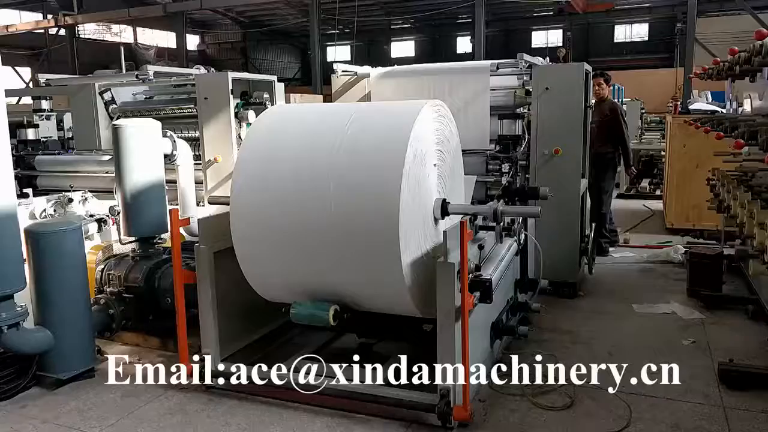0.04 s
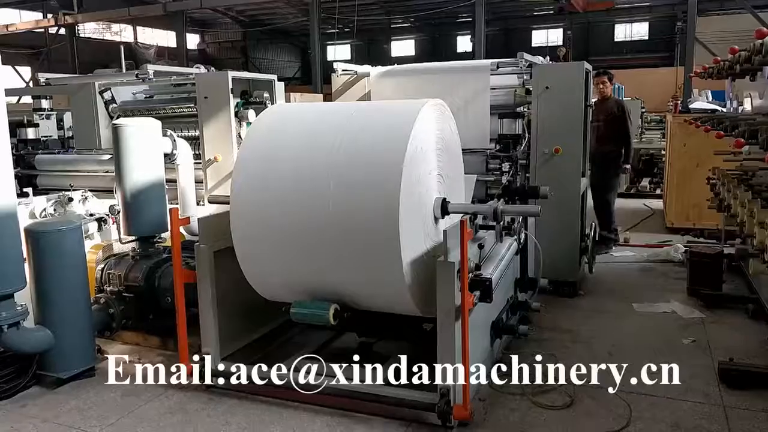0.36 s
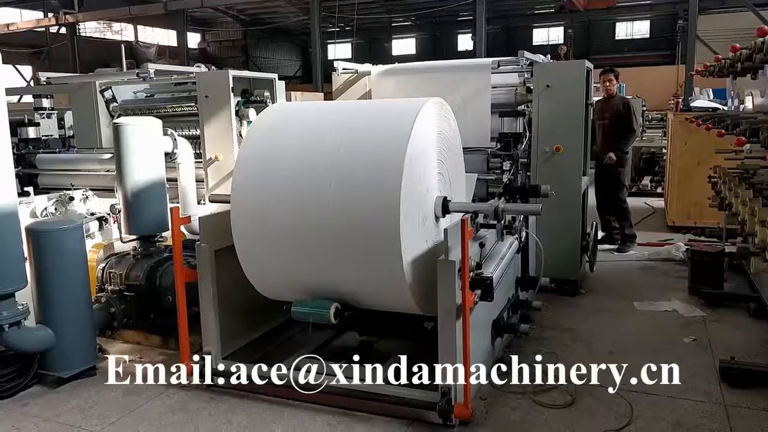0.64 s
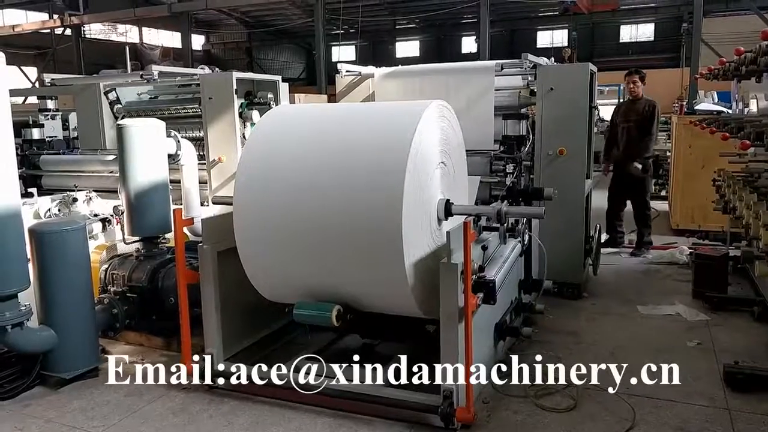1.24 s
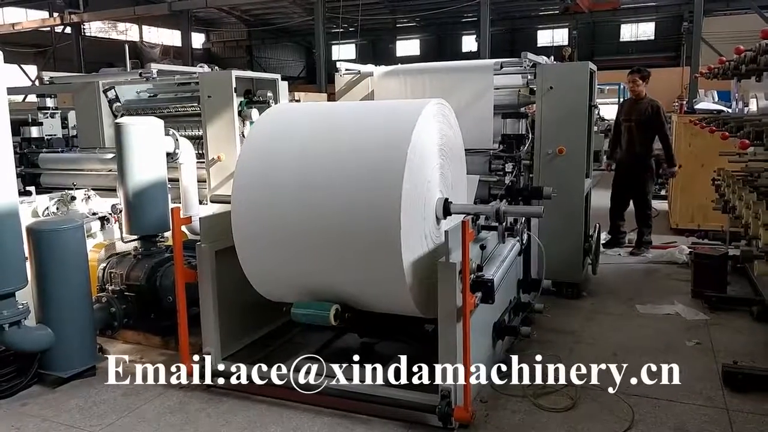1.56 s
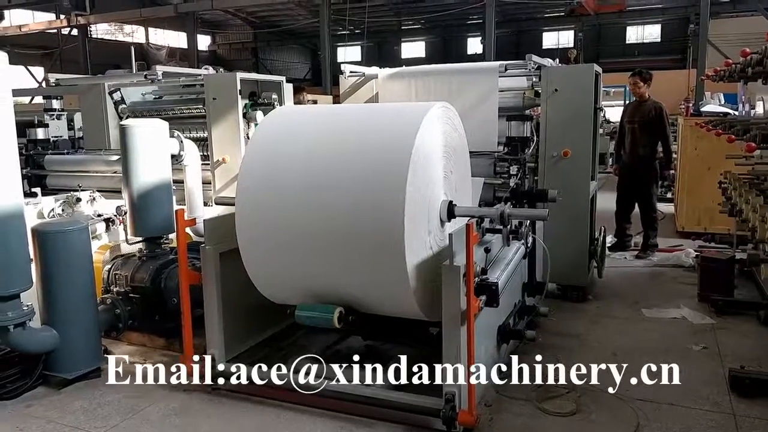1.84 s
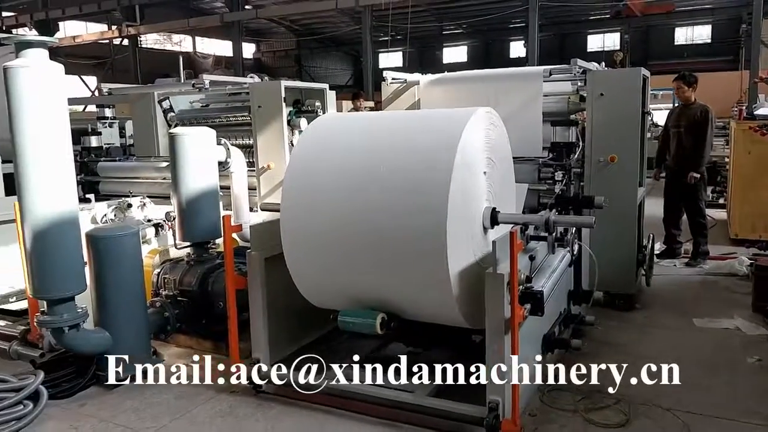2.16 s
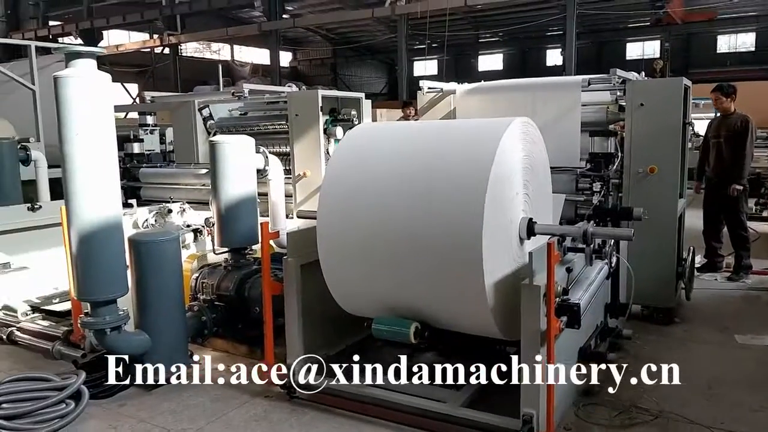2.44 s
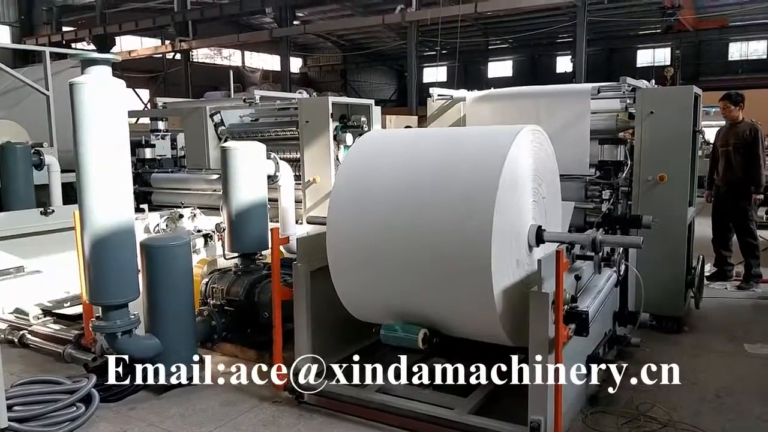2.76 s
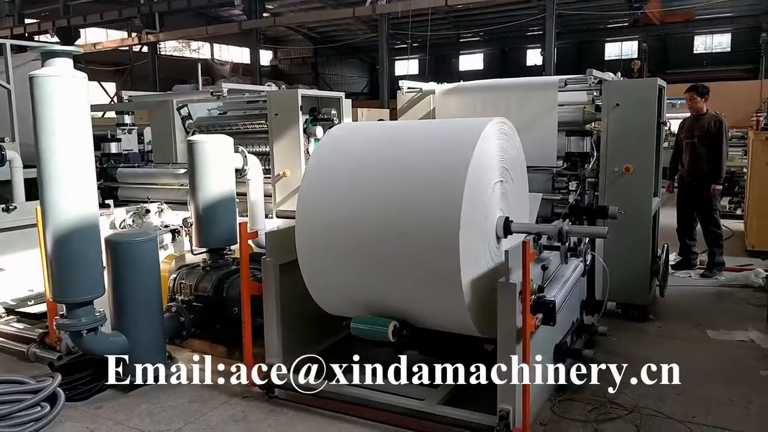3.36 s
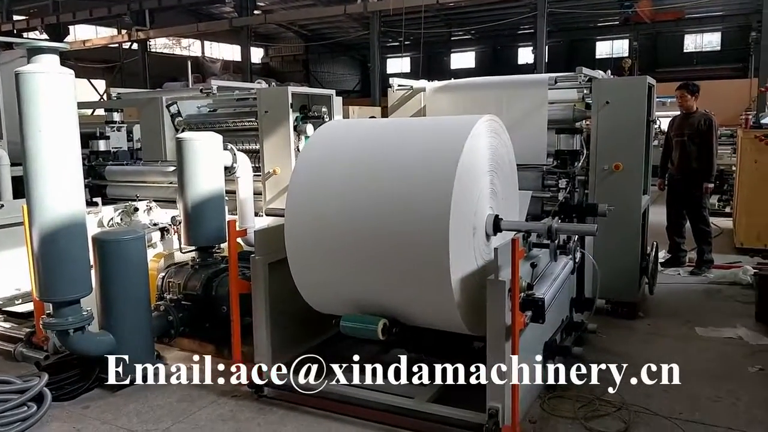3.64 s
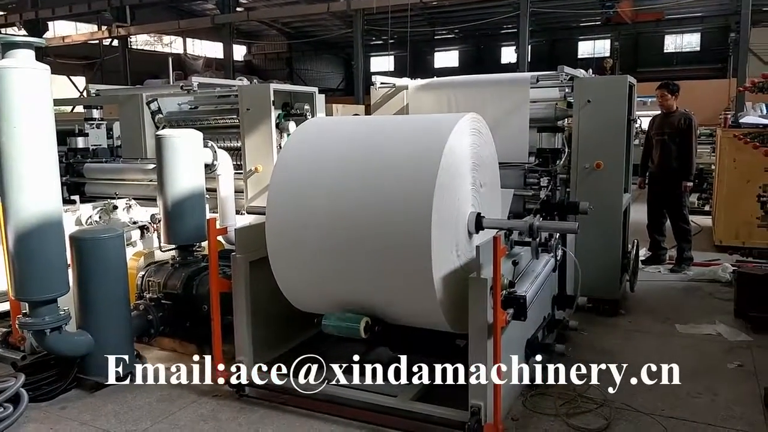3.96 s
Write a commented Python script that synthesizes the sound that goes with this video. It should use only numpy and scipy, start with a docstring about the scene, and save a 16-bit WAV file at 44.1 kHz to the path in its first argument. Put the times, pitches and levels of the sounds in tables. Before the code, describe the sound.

A factory machine clacks rapidly and evenly over a steady humming drone in a hall.

```python
"""A paper converting machine runs in a factory hall. The sound fades in on the drone of a vacuum
blower, humming drive gears, a motor whine and the roar of the hall. From 0.26 s the cutting and
folding head clacks eight times a second, each clack a rattling double blow under which a limiter
dips the drone. From about 0.4 s a roller rubs now and then. A hollow rumble swells at 1.5 s,
a brief hiss follows at 2.2 s, and the rumble returns near 3.3 s."""
import sys
import numpy as np
from scipy import signal
from scipy.fft import rfft, irfft
from scipy.io import wavfile
from scipy.ndimage import uniform_filter1d

SR = 44100
rng = np.random.default_rng(int(sys.argv[2]) if len(sys.argv) > 2 else 0)


def master_out(mix):
    """Clip the mix to full scale and print it as 16-bit PCM to the path in sys.argv[1]."""
    frames = np.transpose(np.atleast_2d(mix))
    ceiling = np.clip(frames, -1, 1)
    pcm = np.round(ceiling * 32767).astype(np.int16)
    wavfile.write(sys.argv[1], SR, pcm)


N = 176400
TIME, FREQ = np.arange(N) / SR, np.fft.rfftfreq(N, 1 / SR)


def amp(db):
    """The decibel scale: 20 dB is a factor of ten in amplitude."""
    return 10 ** (np.asarray(db) / 20)


def unit(x):
    """Normalisation to an rms of one."""
    return x / np.sqrt(np.mean(x ** 2) + 1e-20)


def read(points, hz):
    """Interpolation on a logarithmic frequency axis."""
    f, value = np.transpose(points)
    return np.interp(np.log(hz + 1), np.log(f + 1), value)


def colour(x, gain):
    """Linear filtering: a gain for each frequency."""
    return irfft(rfft(x) * gain, N)


def wander(rate_hz):
    """Low-pass noise: random motion with an rms of one."""
    return unit(colour(rng.standard_normal(N), np.exp(-(FREQ / rate_hz) ** 2) * (FREQ > 0)))


def tones(table, base_hz, waver, waver_hz):
    """Rotation radiates partials at multiples of a base rate, each wavering in level and phase."""
    turn = 2 * np.pi * np.cumsum(base_hz * np.ones(N)) / SR
    out = np.zeros((2, N))
    for multiple, db, lag in table:
        phasor = np.exp(1j * (multiple * turn + rng.uniform(0, 2 * np.pi)))
        phasor *= 1 + waver * (wander(waver_hz) + 1j * wander(waver_hz))
        out += np.sqrt(2) * amp(db) * np.array([phasor.real, (phasor * np.exp(-1j * lag)).real])
    return out


# Likeness of left and right: frequency_hz, correlation
COHERENCE = [(30, 1), (100, 1), (280, 0.91), (430, 0.6), (600, 0), (1000, 0.08), (16000, 0.06)]
def diffuse(gain):
    """A diffuse field: noise coherent between the ears in the bass, nearly unrelated above."""
    common, separate = rng.standard_normal((2, N))
    same = read(COHERENCE, FREQ)
    right = colour(common, gain * same) + colour(separate, gain * np.sqrt(1 - same ** 2))
    return unit(np.array([colour(common, gain), right]))


# Lobe passing rate: time_s, rate_hz
LOBE_RATE = [(0, 160.9), (1.2, 160.2), (2.1, 160.5), (4, 160.7)]
# Blower partials: lobe_rate_multiple, level_db, right_lag_rad
BLOWER_PARTIALS = [(.5, -36.5, 0), (1, -13, -0.14), (2, -17, 0.12), (3, -33, 1), (3.5, -37, -0.82),
                   (10, -44, 1)]
def blower():
    """Periodic flow: the lobes of the vacuum blower pulse the air into a drone."""
    lobe_hz = np.interp(TIME, *np.transpose(LOBE_RATE))
    return tones(BLOWER_PARTIALS, lobe_hz, waver=0.063, waver_hz=8.7)


# Gear partials: stroke_rate_multiple, level_db, right_lag_rad
GEAR_PARTIALS = [(8.11, -43.5, 0), (11.91, -44.5, 0), (14.02, -34, 0), (14.98, -22.5, 0),
                 (45.4, -35.5, 0.25)]
def gears(stroke_hz=8.078, throb_depth=0.13, throb_peak_s=0.206):
    """Amplitude modulation: the hum of the drive gears throbs once in two strokes."""
    throb = 1 + throb_depth * np.cos(np.pi * stroke_hz * (TIME - throb_peak_s))
    return throb * tones(GEAR_PARTIALS, stroke_hz, waver=0.097, waver_hz=7.1)


# Motor partials: base_rate_multiple, level_db, right_lag_rad
MOTOR_PARTIALS = [(883, -33.5, 0.75), (882, -49.5, -0.9)]
def motor():
    """Interference: two close, wavering tones merge into a motor whine near 839 Hz."""
    return tones(MOTOR_PARTIALS, base_hz=0.95, waver=0.3, waver_hz=3.6)


# Spectrum of the roar: frequency_hz, relative_db
ROAR_SPECTRUM = [(20, -17), (50, -8), (85, -14.5), (115, 2.5), (200, 0), (340, -0.5), (480, -4.5),
                 (620, -6), (760, -3.5), (1020, -6), (1200, -14), (1800, -17.5), (2300, -13), (3200, -13),
                 (4500, -20.5), (5600, -18), (6600, -34), (8000, -23.5), (9500, -28.5), (13000, -24),
                 (16000, -26)]
def hall_roar(level_db=-17.5, flutter_db=1.5):
    """Incoherent sources add: running paper, bearings and other machines blend into a roar."""
    roar = diffuse(amp(read(ROAR_SPECTRUM, FREQ)))
    return amp(level_db) * roar * amp(flutter_db * wander(rate_hz=33))


def burst(start_s, decay_s, attack_s=0.003):
    """Damped transient: a linear rise, then exponential decay."""
    t = np.maximum(TIME - start_s, 0)
    return np.minimum(t / attack_s, 1) * np.exp(-np.maximum(t - attack_s, 0) / decay_s)


# Strokes of the head: start_s, first_blow_relative_db, second_blow_relative_db
STROKES = [(0.255, 0, 1), (0.38, -1, -1), (0.502, -5, -3), (0.627, 0, 1.5), (0.75, 0.5, -4.5),
           (0.874, -6.5, -4), (0.997, 2, 2), (1.121, 0, -1), (1.247, -5, -1.5), (1.369, -1.5, 3),
           (1.494, 0, -5), (1.617, -4.5, 0), (1.741, -1.5, 0.5), (1.865, -0.5, -3), (1.989, -2.5, -4.5),
           (2.11, -1.5, 0.5), (2.237, 0.5, -0.5), (2.359, -4, 0), (2.483, -3.5, 1.5), (2.608, -1.5, -4),
           (2.73, -3.5, -1.5), (2.854, 0, 1), (2.978, 0, -1), (3.103, -4.5, -0.5), (3.225, -1, 2.5),
           (3.349, -1, -1.5), (3.473, -5, -0.5), (3.598, 0, 0.5), (3.721, -0.5, -1.5), (3.847, -5.5, 0.5),
           (3.969, 1, 0.5)]
def double_blows(decay_s=0.016, gap_s=0.012, jitter_s=0.0017, second_gain=0.84, ticks_per_s=2500):
    """Each stroke is two bursts of tiny impacts; being incoherent, they add in power."""
    power = np.zeros(N)
    for start_s, first_db, second_db in STROKES:
        second_s = start_s + gap_s + jitter_s * rng.standard_normal()
        power += (amp(first_db) * burst(start_s, decay_s)) ** 2
        power += (amp(second_db) * second_gain * burst(second_s, decay_s)) ** 2
    chatter = amp(1.5 * wander(rate_hz=900))
    rattle = unit(rng.standard_normal((2, N)) * chatter)
    ticks = unit(rng.choice([-1., 1.], (2, N)) * (rng.random((2, N)) < ticks_per_s / SR))
    return unit(rattle + 0.46 * ticks) * np.sqrt(power)


# Spectrum of a blow: frequency_hz, relative_db
SNAP_SPECTRUM = [(300, -25), (1000, -10), (1800, -26), (2100, 3), (2450, 4.5), (2900, -1.5), (4000, -3),
                 (5600, -8.5), (6700, -12), (7800, -7.5), (9300, -10.5), (12000, -7), (15000, 0.5),
                 (16000, -14)]
# Modes of the steel head: pitch_hz, relative_db, t60_s
HEAD_MODES = [(2140, -14, 0.052), (2275, -12, 0.095), (2422, -4, 0.1), (2520, -6.5, 0.05),
              (2783, -11, 0.084), (2991, -1.5, 0.065), (3537, -9, .06)]
def cutting_head(snap_db=-9, ring_db=-20):
    """Impact excitation: the blows radiate a broadband snap and ring the damped modes of the steel."""
    blows = double_blows()
    snap = colour(blows, unit(amp(read(SNAP_SPECTRUM, FREQ))))
    t = TIME[:SR // 5]
    modes = sum(amp(db - 60 * t / t60) * np.sin(2 * np.pi * hz * t) for hz, db, t60 in HEAD_MODES)
    ring = signal.fftconvolve(blows, modes[None] / np.linalg.norm(modes), axes=1)[:, :N]
    return amp(snap_db) * snap + amp(ring_db) * ring


# Reverberation time of the hall: frequency_hz, t60_s
HALL_DECAY = [(200, 1), (2500, 0.45), (6000, 0.42), (15000, 0.22)]
def reverb(x, build_s=0.013):
    """Reverberation: dense reflections form a tail whose treble is absorbed first."""
    hz, t, spectra = signal.stft(rng.standard_normal((2, SR)), SR, nperseg=256)
    spectra *= amp(-60 * t / read(HALL_DECAY, hz)[:, None])
    tail = signal.istft(spectra, SR, nperseg=256)[1]
    tail *= np.clip(TIME[:tail.shape[1]] / build_s, 0, 1) ** 2
    return signal.fftconvolve(x, tail / np.linalg.norm(tail[0]), axes=1)[:, :N]


# Swells of rubbing: centre_s, relative_db
RUB_SWELLS = [(.44, 1), (.62, -4), (.8, -9), (1.08, 3), (1.31, -3.5), (1.69, -3), (1.94, -2), (2.33, -1.5),
              (2.56, -4.5), (2.91, -1.5), (3.18, -1), (3.62, -5), (3.84, 3)]
def roller(pitch_hz=811, half_width_hz=14.7, half_length_s=0.067, level_db=-20.5):
    """Friction: a rubbing roller drives one narrow resonance in swells."""
    swells = sum(amp(db) * np.exp(-((TIME - s) / half_length_s) ** 2) for s, db in RUB_SWELLS)
    resonance = 1 / (1 + ((FREQ - pitch_hz) / half_width_hz) ** 2)
    return amp(level_db) * swells * diffuse(resonance)


# Swells of rumble: centre_s, half_length_s, level_db
RUMBLE_SWELLS = [(1.498, .09, -21.5), (3.256, 0.11, -19.5)]
def rumble(centre_hz=380, half_width_hz=78):
    """Band-limited noise: a low, narrow band swells twice as a hollow rumble."""
    swells = sum(amp(db) * np.exp(-((TIME - s) / half) ** 2) for s, half, db in RUMBLE_SWELLS)
    return swells * diffuse(1 / (1 + ((FREQ - centre_hz) / half_width_hz) ** 4))


# Puff of hiss: start_s, decay_s, level_db
HISS_BURSTS = [(2.195, 0.029, -14.5)]
# Spectrum of the hiss: frequency_hz, relative_db
HISS_SPECTRUM = [(2000, -22), (4300, -12), (5300, 0), (6500, -9), (9500, -16), (12500, -6), (15500, -7.5)]
def hiss():
    """A noise transient: treble hiss decays exponentially between two strokes."""
    envelope = sum(amp(db) * burst(s, decay_s) for s, decay_s, db in HISS_BURSTS)
    return envelope * diffuse(amp(read(HISS_SPECTRUM, FREQ)))


# Shading of the microphones: frequency_hz, left_minus_right_db
MIC_SHADING = [(60, -3), (120, -0.75), (220, -3.56), (380, -0.5), (600, 1.3), (1290, 1), (2380, -1),
               (4400, -3.5), (6300, -2), (8100, -4.5), (9500, -8.5), (12300, 1.5), (13500, 1), (15000, 26),
               (16000, 21)]
def scene(reverb_db=-6):
    """Superposition: all sources add at two microphones, each shaded differently."""
    transients = cutting_head() + hiss()
    reflections = amp(reverb_db) * reverb(transients)
    drone = blower() + gears() + motor()
    mix = transients + reflections + drone + roller() + rumble() + hall_roar()
    sides = amp(read(MIC_SHADING, FREQ) * np.array([[0.5], [-0.5]]))
    return colour(mix, sides / np.sqrt(np.mean(sides ** 2, 0)))


# Fade-in: time_s, gain_db
FADE_IN = [(0, -80), (.19, -67), (.226, -34), (.233, -15), (.256, -8.5), (.33, -4), (.385, -2), (.45, 1.5)]
def record(dry, threshold_db=-3.5, ratio=3.6, release_db_per_s=108, trim_db=-0.5, cutoff_hz=15850):
    """Dynamic compression: a limiter ducks the mix at each peak; a fade-in and low-pass follow."""
    peak_db = 20 * np.log10(abs(dry).max(0) + 1e-9)
    release_db = TIME * release_db_per_s
    held_db = np.maximum.accumulate(peak_db + release_db) - release_db
    over_db = np.maximum(held_db - threshold_db, 0)
    duck_db = uniform_filter1d(over_db, size=130) * (1 - 1 / ratio)
    fade_db = np.interp(TIME, *np.transpose(FADE_IN))
    lowpass = signal.firwin(511, cutoff_hz, window=("kaiser", 9), fs=SR)
    return signal.oaconvolve(dry * amp(trim_db - duck_db + fade_db), lowpass[None], "same")


dry = scene()
out = record(dry)
master_out(out)
```